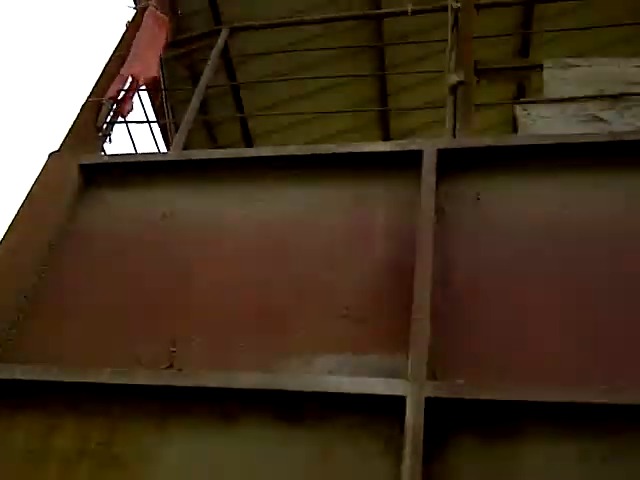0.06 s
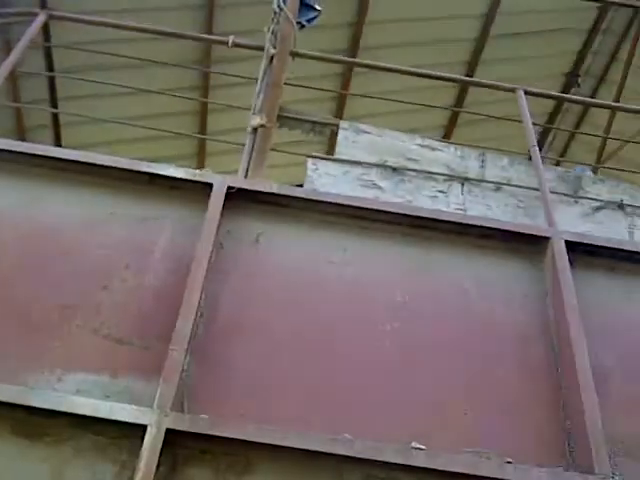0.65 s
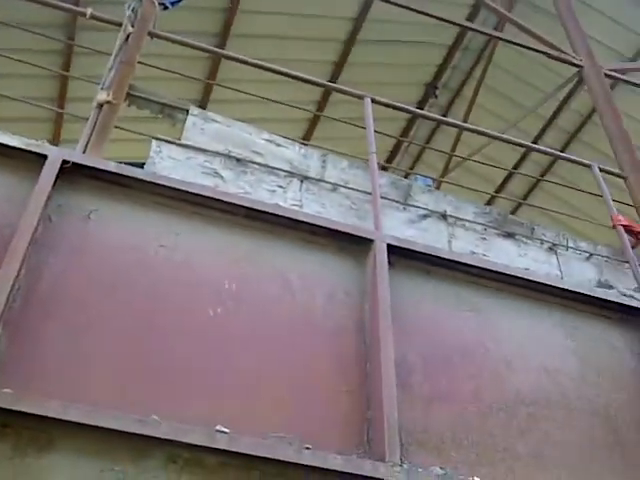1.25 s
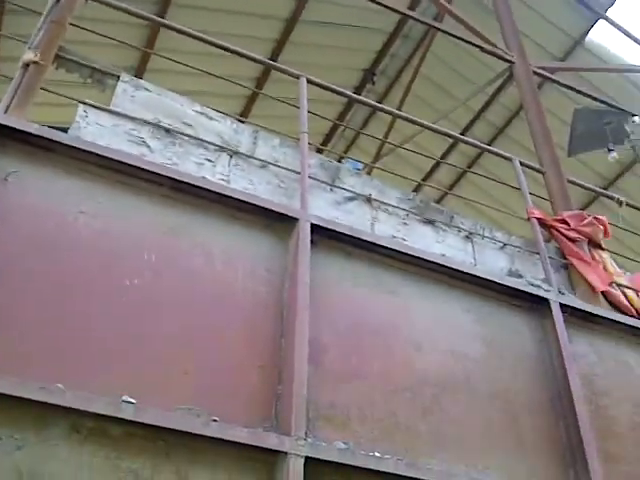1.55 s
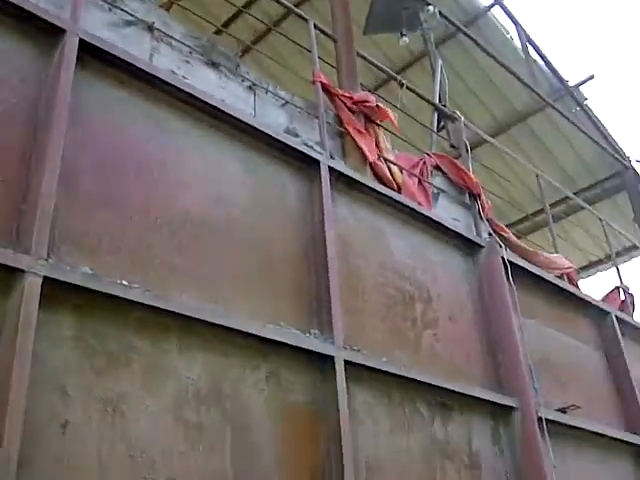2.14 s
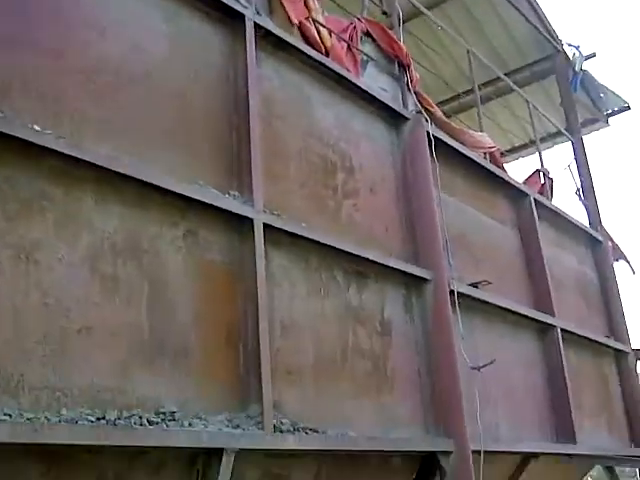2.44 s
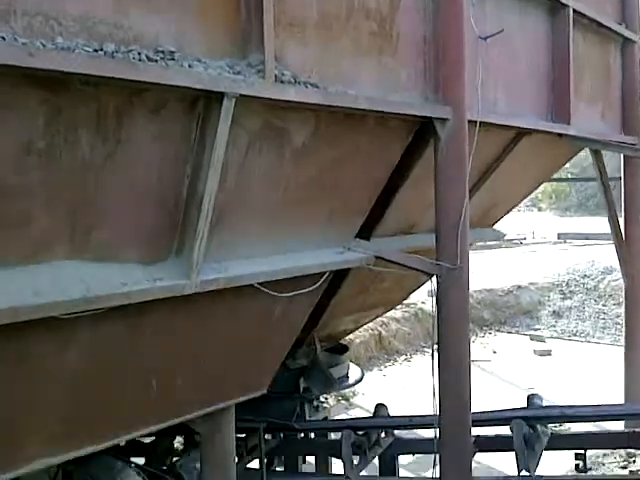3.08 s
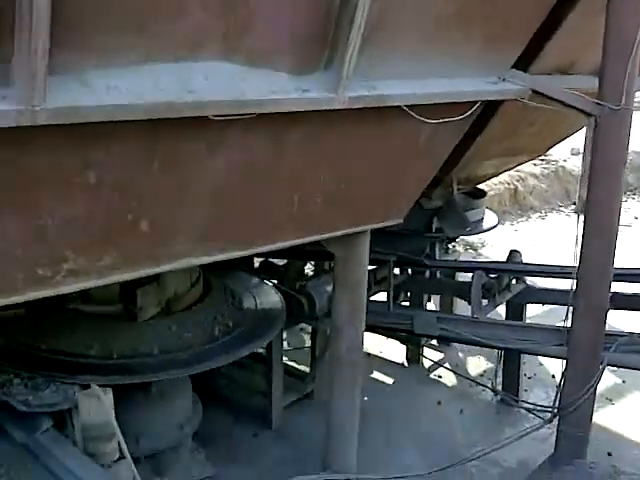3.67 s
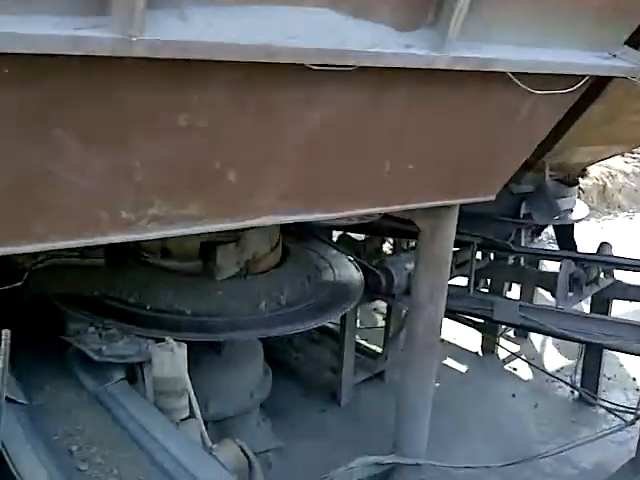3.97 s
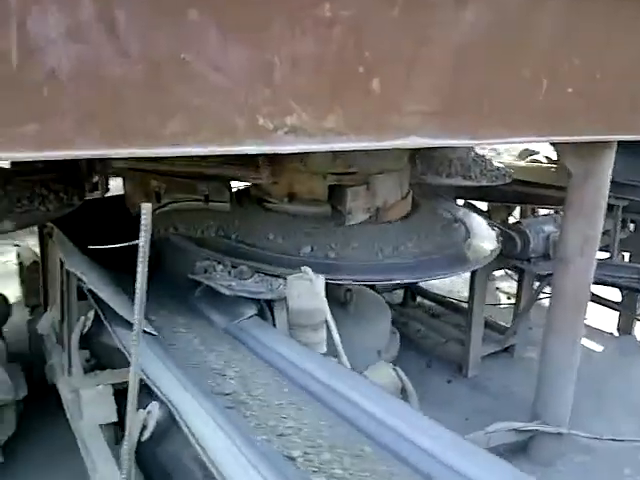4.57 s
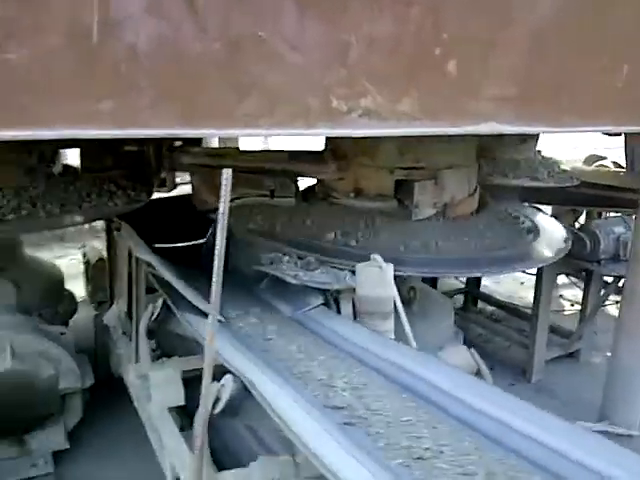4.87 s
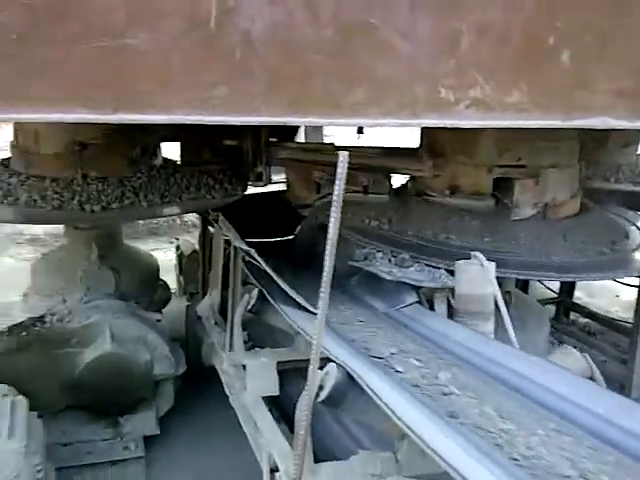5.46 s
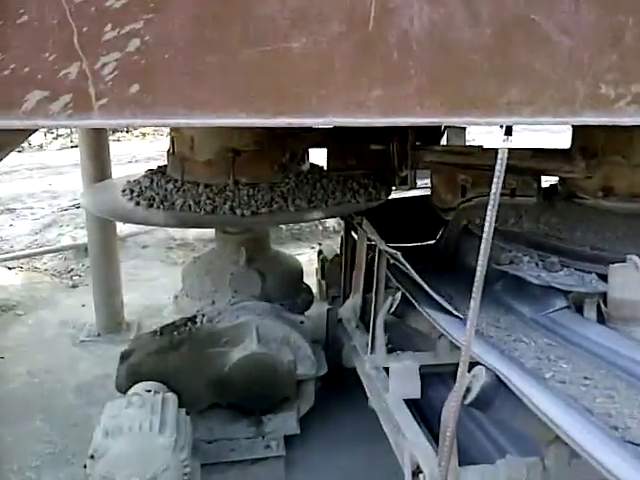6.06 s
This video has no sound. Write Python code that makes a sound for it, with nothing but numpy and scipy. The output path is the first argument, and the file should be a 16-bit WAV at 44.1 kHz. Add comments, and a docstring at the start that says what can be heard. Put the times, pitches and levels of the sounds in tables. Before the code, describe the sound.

A loud, steady, hollow roar of a rock mill, with crushed ore rattling on a conveyor belt and a gearbox humming.

```python
"""A dense, hollow roar fills an ore plant: rock tumbles in a mill and rings the steelwork of a hopper.
Crushed ore rattles onto a rumbling conveyor belt, with scraping surges and snaps of grit.
Over the low hum of a second drive, the meshing teeth of a feeder gearbox sing louder as a hand-held
camera dips under the hopper and turns to the disc feeders. Its gain control evens out the din."""
import sys
import numpy as np
from scipy import signal
from scipy.fft import rfft, irfft
from scipy.io import wavfile
from scipy.ndimage import uniform_filter1d, minimum_filter1d

SR = 44100
rng = np.random.default_rng(int(sys.argv[2]) if len(sys.argv) > 2 else 0)


def file_out(sig):
    """Save sig as 16-bit WAV at sys.argv[1]."""
    # one column per channel
    cols = np.atleast_2d(sig).T
    # limit, then scale
    lim = np.clip(cols, -1, 1)
    pcm = np.round(lim * 32767).astype(np.int16)
    wavfile.write(sys.argv[1], SR, pcm)


N = 278712
T = np.arange(N) / SR
FREQS = np.maximum(np.arange(N // 2 + 1) * SR / N, 1)


def undb(db):
    """Decibels to amplitude ratio."""
    return 10 ** (np.asarray(db) / 20)


def unit(x):
    """Normalisation to an rms of 1."""
    return x / np.sqrt(np.mean(x ** 2))


def curves(table):
    """Linear interpolation of each column over time."""
    times_s, *columns = np.transpose(table)
    return [np.interp(T, times_s, column) for column in columns]


def swell(peak_s, half_width_s):
    """A Gaussian envelope of height 1."""
    return np.exp(-((T - peak_s) / half_width_s) ** 2)


def walk(rate_hz):
    """Low-pass noise: a smooth random drift with an rms of 1."""
    bins_hz = np.arange(len(FREQS)) * SR / N
    return unit(irfft(rfft(rng.standard_normal(N)) / (1 + (bins_hz / rate_hz) ** 4), N))


def band(x, centre_hz, width_hz):
    """A second-order resonance, gain 1 at its centre."""
    return signal.lfilter(*signal.iirpeak(centre_hz, centre_hz / width_hz, fs=SR), x)


def tone(hz, waver, wander_rad, waver_hz):
    """Amplitude and phase modulation: a machine tone wavers with the load."""
    amplitude = np.sqrt(2) * (1 + waver * walk(waver_hz))
    return amplitude * np.sin(2 * np.pi * hz * T + wander_rad * walk(2) + 2 * np.pi * rng.random())


def impacts(per_s, spread_db, t60_s):
    """Shot noise: random blows of unequal size, each decaying as a short burst of noise."""
    hits = rng.random(N) < per_s / SR
    blows = hits * undb(spread_db * np.minimum(rng.exponential(size=N), 4))
    decay = undb(-60 / (t60_s * SR)) ** 2
    energy, _ = signal.lfilter([1 - decay], [1, -decay], blows ** 2, zi=[np.mean(blows ** 2)])
    return unit(np.sqrt(energy) * rng.standard_normal(N))


# modes of the mill shell and hopper plates: centre_hz, width_hz, lift_db
STEEL_MODES = [(113, 5.3, 1), (196, 3.9, 1), (284, 9.4, 4), (434, 8.8, 3.5), (563.4, 9.2, 3), (632, 9, 6),
               (697, 6.7, 2), (777, 5.5, 2.5), (968, 10, 3), (1109, 11, 3.5), (1218, 16, 3.5),
               (1315, 28, 0.5), (1360, 7.3, 2)]
def colour(x, spectrum):
    """Source and filter: a broad spectrum and the modes of the steel shape a sound, at an rms of 1."""
    hz, db = np.transpose(spectrum)
    rolloff = np.minimum(hz[-1] / FREQS, 1) ** 16
    gain = undb(np.interp(np.log(FREQS), np.log(hz), db)) * rolloff
    for centre_hz, width_hz, lift_db in STEEL_MODES:
        gain = gain * (1 + (undb(lift_db) - 1) / (1 + 2j * (FREQS - centre_hz) / width_hz))
    return unit(irfft(rfft(x) * gain, N))


# the camera's turn: time_s, facing_share (0 the hopper wall, 1 the feeders)
CAMERA_TURN = [(0, 0.075), (1.8, 0.1), (4.2, 0.26), (5.0, 0.69), (6.0, 0.7)]
def by_view(wall_db, feeder_db):
    """Directional pickup: a source's gain shifts as the camera turns from wall to feeders."""
    facing, = curves(CAMERA_TURN)
    return undb(wall_db + facing * (feeder_db - wall_db))


def screening(above_db, below_db):
    """Acoustic shadow: a source's gain shifts as the camera dips under the hopper's edge."""
    dip_start_s, dip_end_s = 1.7, 3.3
    return undb(np.interp(T, [dip_start_s, dip_end_s], [above_db, below_db]))


def tick(start_s=2.65, peak_db=-19.5):
    """A damped impulse: one faint, bright tick."""
    impulse = np.zeros(N)
    impulse[int(start_s * SR)] = undb(peak_db)
    return signal.lfilter([1], [1, -.6], impulse)


# spectrum of grit on steel: frequency_hz, relative_db
CHIP_SPECTRUM = [(2000, -5), (3500, 2), (5000, -8.5), (6500, -13), (7300, -19.5), (8000, -32.5)]
def chips():
    """Sparse impacts: chips of grit snap on the steel, fainter once the hopper screens them."""
    snaps = colour(impacts(per_s=55, spread_db=1, t60_s=0.0098), CHIP_SPECTRUM)
    return snaps * screening(above_db=-54.5, below_db=-58.05)


# ringing plates: peak_s, half_width_s, pitch_hz, level_db
PLATE_TONES = [(0.3, .2, 1109, -33.5), (0.51, .18, 885, -27), (0.64, .2, 772, -31),
               (0.81, 0.17, 954, -30.5), (1.1, .4, 1220, -37.5), (1.81, .17, 630, -26),
               (2.95, .3, 971, -28.5), (2.95, .4, 1218, -36), (4.23, .3, 1109, -33), (4.4, .4, 1298, -35),
               (5.2, .3, 981, -38), (5.75, 0.34, 1115, -37)]
def plates(beat_hz=4.1):
    """Randomly driven resonance: struck plates swell and fade, each in a narrow, beating band."""
    out = np.zeros(N)
    for peak_s, half_width_s, pitch_hz, level_db in PLATE_TONES:
        phase = 2 * np.pi * pitch_hz * T
        ring = walk(beat_hz) * np.sin(phase) + walk(beat_hz) * np.cos(phase)
        out += ring * swell(peak_s, half_width_s) * undb(level_db)
    return out


# hum of the second drive: harmonic_number, wall_db, feeder_db
DRIVE_HARMONICS = [(1, -49.5, -49.5), (2, -39.5, -30.5), (3, -32, -34.5), (4, -40.5, -44), (6, -43.5, -49),
                   (8, -48.5, -38), (9, -42.5, -49)]
def drive(fundamental_hz=70.42, mains_hum_hz=100):
    """A harmonic series: the second drive hums, along with the mains hum of its motor."""
    hum = sum(tone(k * fundamental_hz, waver=0.23, wander_rad=0.81, waver_hz=3) * by_view(*levels_db)
              for k, *levels_db in DRIVE_HARMONICS)
    return hum + tone(mains_hum_hz, waver=0.19, wander_rad=0.2, waver_hz=3) * undb(-46.5)


def clinks(count, low_hz, high_hz, t60_s, spread_db):
    """Damped free vibration: each stone that knocks on steel rings at a pitch of its own."""
    t = np.arange(2048) / SR
    out = np.zeros(N + len(t))
    onset = 1 - np.exp(-t / .002)  # blurred by the plates around
    for when, pitch, size, ring in rng.random((count, 4)):
        start = int(when * N)
        hz = low_hz + pitch * (high_hz - low_hz)
        strength = undb(spread_db * min(-np.log(1 - size), 3))
        decay = np.exp(-np.log(1000) * t / (t60_s * (.5 + ring)))
        out[start:start + len(t)] += strength * onset * decay * np.sin(2 * np.pi * hz * t)
    return unit(out[:N])


# spectrum of crushed ore: frequency_hz, relative_db
ORE_SPECTRUM = [(700, -14.5), (1500, 5.5), (2300, 3), (2800, -4), (3500, -5), (4300, -11), (5000, -16.5),
                (5700, -21.5), (6500, -26.5), (7100, -35.5), (7600, -55.5)]
def ore_rattle(blows):
    """Spectral shaping: blows take on the bright timbre of crushed ore."""
    return colour(blows, ORE_SPECTRUM)


# ore sliding off the feeders: peak_s, half_width_s, centre_hz, level_db
ORE_SLIDES = [(0.14, 0.07, 3250, -37), (0.14, .08, 1990, -34.5), (0.75, 0.057, 1110, -34),
              (0.97, .05, 3670, -39), (1.37, 0.048, 2000, -33), (1.83, 0.034, 3400, -38.5),
              (2.36, .08, 3050, -34), (2.73, 0.11, 2600, -34.5), (3.45, .035, 2950, -35),
              (4.12, 0.13, 1144, -33), (4.43, 0.04, 2000, -36), (4.76, 0.093, 2600, -38),
              (5.59, 0.06, 1990, -31), (5.9, 0.13, 2170, -34.5)]
def surges(relative_bandwidth=0.41):
    """Friction noise: heaps of ore let go and scrape down the steel, higher for finer stone."""
    scrape = ore_rattle(impacts(per_s=1400, spread_db=-0.5, t60_s=0.08))
    return sum(unit(band(scrape, hz, hz * relative_bandwidth)) * swell(peak_s, half_width_s) * undb(db)
               for peak_s, half_width_s, hz, db in ORE_SLIDES)


# spectrum of the loaded belt: frequency_hz, relative_db
BELT_SPECTRUM = [(20, -41), (42, -29), (62, -10.5), (80, -7.5), (110, 4), (155, 6), (210, 1.5), (330, -1),
                 (700, -58.5)]
# how freely ore runs onto the belt: time_s, gain_db
ORE_FLOW = [(0, -1), (1.0, 1), (1.17, -1.5), (1.35, 0), (2.9, 0.4), (3.2, -1), (3.8, -0.5), (4.1, 0.1),
            (4.9, -1), (5.28, -1), (5.55, -0.3), (5.95, 0.5), (6.15, -2)]
def conveyor():
    """Rolling and impact noise: the belt rumbles over its idlers while ore spills onto it."""
    rumble = colour(impacts(per_s=900, spread_db=3.5, t60_s=0.079), BELT_SPECTRUM)
    knocks = clinks(count=3000, low_hz=799, high_hz=5192, t60_s=0.072, spread_db=1.5)
    stones = ore_rattle(impacts(per_s=1300, spread_db=3, t60_s=0.068) + undb(-13) * knocks)
    grit = signal.sosfilt(signal.butter(1, 3800, "high", fs=SR, output="sos"), stones)
    coarse = stones - grit
    flow = undb(curves(ORE_FLOW)[0] + 0.43 * walk(4.9))
    spill = (coarse + grit * screening(above_db=3.5, below_db=-0.05)) * flow
    return rumble * by_view(wall_db=-30, feeder_db=-28) + spill * by_view(wall_db=-32, feeder_db=-31.5)


# nodes (dips) and antinodes (swells) on the microphone's path: time_s, shaft_order, half_width_s, gain_db
WAVE_CROSSINGS = [(0.72, 20, 0.15, -19), (1.3, 20, 0.35, -1.5), (4.19, 20, 0.25, -11), (4.68, 20, 0.15, -4),
                  (5.42, 20, 0.065, -3.5), (6.2, 20, 0.2, 1.5), (1.1, 40, 0.28, -14), (2.15, 40, 0.36, -4),
                  (2.8, 40, 0.23, -18), (3.94, 40, 0.26, -7), (3.24, 40, 0.14, 1), (0.091, 40, 0.2, 3),
                  (4.48, 40, 0.21, -20), (6.3, 40, 0.08, 3.5), (1.8, 41, 0.6, -12.5), (6.1, 40, 0.35, 1.6),
                  (3, 20, 0.5, 0.5), (1.2, 60, 0.53, 12.5)]
def standing_wave(order):
    """Interference: a gear tone fades and swells as the microphone crosses its nodes and antinodes."""
    return undb(sum(gain_db * swell(time_s, half_width_s)
                    for time_s, k, half_width_s, gain_db in WAVE_CROSSINGS if round(k) == order))


# weaker gearbox tones: shaft_order (multiple of the shaft rate), wall_db, feeder_db
GEAR_PARTIALS = [(20.73, -42, -41.5), (41.04, -33, -38), (60.1, -41.5, -49), (79.4, -41, -46.5),
                 (99.6, -41, -48.5)]
def gearbox(shaft_hz=12.1, teeth=20):
    """Gear mesh: a tone at shaft rate times tooth count, with overtones and eccentric-pinion sidebands."""
    mesh_hz = shaft_hz * teeth
    mesh = tone(mesh_hz, waver=0.045, wander_rad=0.044, waver_hz=10) * standing_wave(teeth)
    mesh *= by_view(wall_db=-31, feeder_db=-24) * screening(above_db=0, below_db=5.5)
    octave = tone(2 * mesh_hz, waver=0.18, wander_rad=0.25, waver_hz=9.2) * standing_wave(2 * teeth)
    out = mesh + octave * by_view(wall_db=-26.5, feeder_db=-25.5)
    for order, wall_db, feeder_db in GEAR_PARTIALS:
        partial = tone(order * shaft_hz, waver=0.42, wander_rad=0.84, waver_hz=11)
        out += partial * by_view(wall_db, feeder_db) * standing_wave(round(order))
    return out


# spectrum of tumbling rock: frequency_hz, relative_db
MILL_SPECTRUM = [(100, -23), (170, -6.5), (280, 1.5), (390, 0.2), (560, 1.04), (850, -0.9), (1300, -2.5),
                 (1650, -9.5), (2100, -16.5), (3000, -22), (5000, -50.5)]
# hollow resonances under the hopper, along the camera's path: time_s, cavity_db, wall_db
HOPPER_LIFTS = [(0.2, -3, -0.7), (0.8, 0.5, 1.5), (1.9, -1, 1), (2.7, -1, 0), (3.5, -0.5, -1),
                (4.2, 0.5, 1), (5.0, 0.2, 0.6), (5.8, -3, -1)]
def mill():
    """Superposition: blows of rock and balls in the drum merge into a roar, made hollow by the hopper."""
    roar = colour(impacts(per_s=2600, spread_db=2, t60_s=0.14), MILL_SPECTRUM)
    cavity_db, wall_db = curves(HOPPER_LIFTS)
    cavity = band(roar, centre_hz=280, width_hz=260) * (undb(cavity_db) - 1)
    wall = band(roar, centre_hz=730, width_hz=378) * (undb(wall_db) - 1)
    return (roar + cavity + wall) * by_view(wall_db=-17.5, feeder_db=-19.8)


def scene():
    """Sound pressures add: all machines run at once, in one channel."""
    return (mill() + conveyor() + surges() + chips() + gearbox() + drive() + plates() + tick())[None]


def record(dry):
    """Compression: gain control evens out the din, a limiter holds peaks, a low-pass cuts the very top."""
    target_db, window_s, swing_share = -15.5, 0.15, 0.47
    ceiling, cutoff_hz = 0.49, 15800
    rms = np.sqrt(uniform_filter1d(dry ** 2, size=int(window_s * SR)))
    even = dry * (undb(target_db) / rms) ** swing_share
    limiter_gain = minimum_filter1d(ceiling / np.maximum(np.abs(even), ceiling), size=500)
    smooth_gain = uniform_filter1d(uniform_filter1d(limiter_gain, size=250), size=250)
    return signal.sosfilt(signal.ellip(8, .2, 70, cutoff_hz, fs=SR, output="sos"), even * smooth_gain)


dry = scene()
out = record(dry)
file_out(out)
```